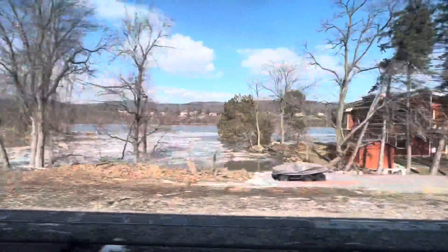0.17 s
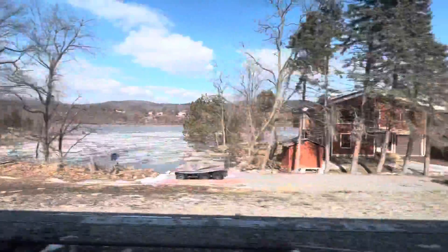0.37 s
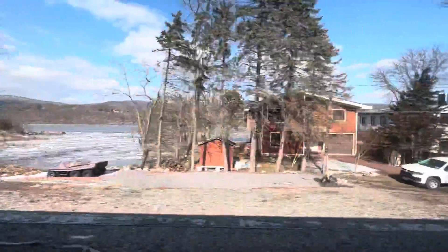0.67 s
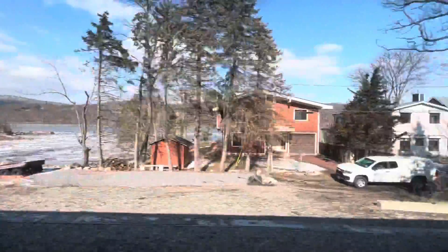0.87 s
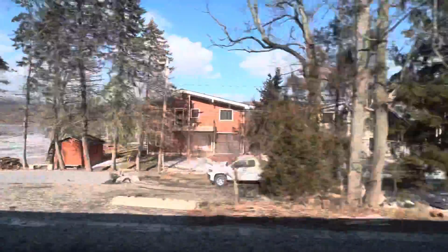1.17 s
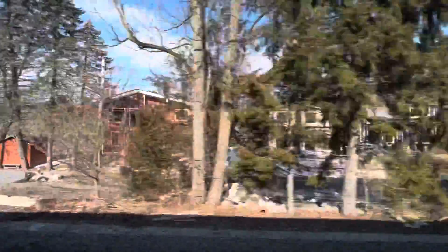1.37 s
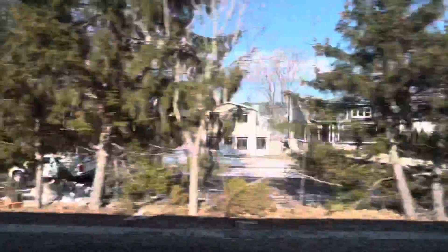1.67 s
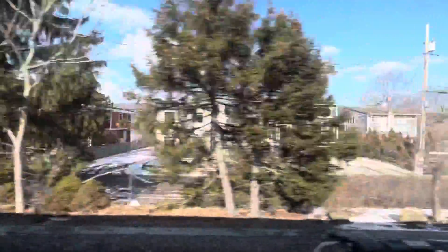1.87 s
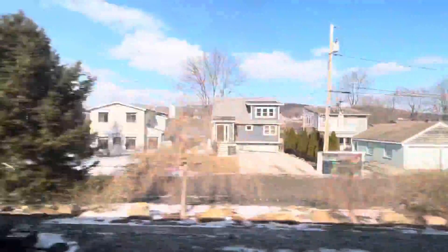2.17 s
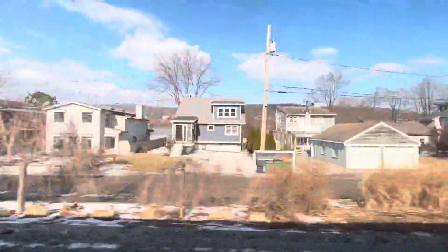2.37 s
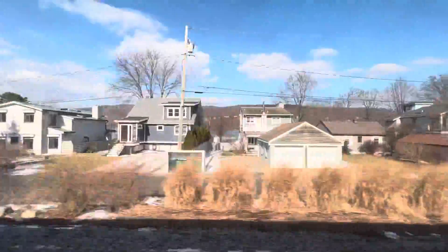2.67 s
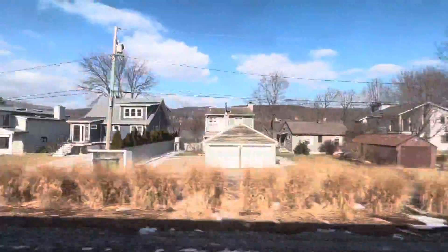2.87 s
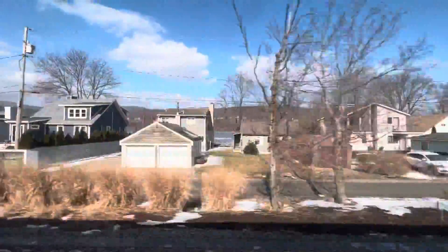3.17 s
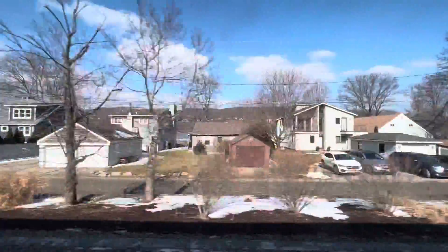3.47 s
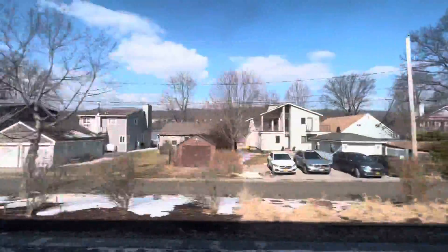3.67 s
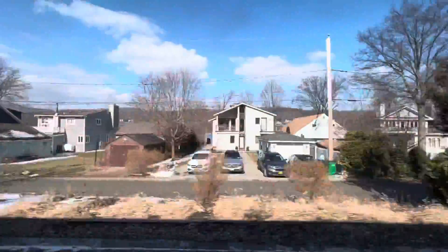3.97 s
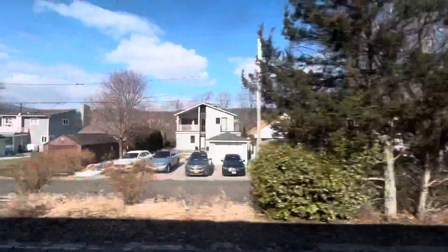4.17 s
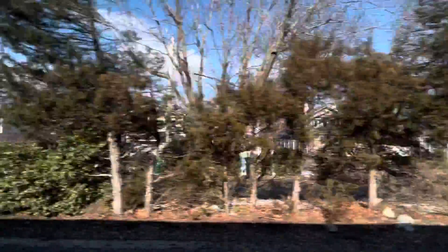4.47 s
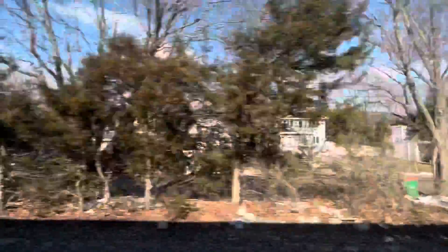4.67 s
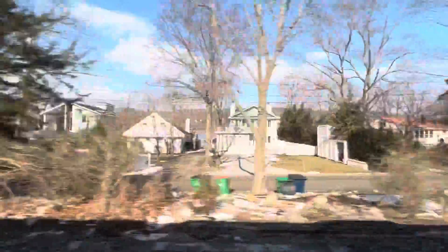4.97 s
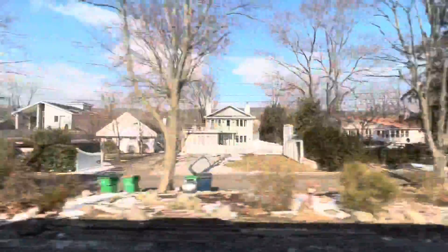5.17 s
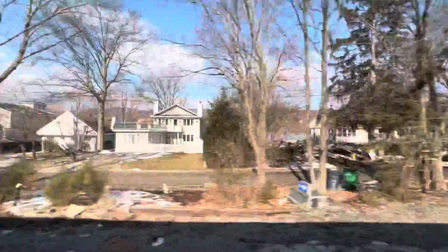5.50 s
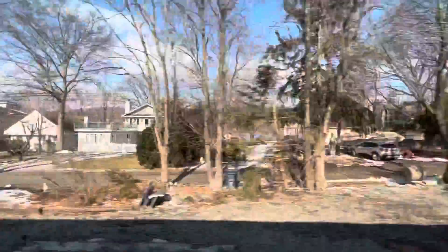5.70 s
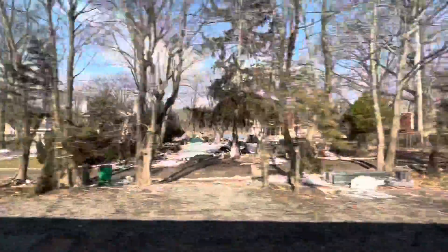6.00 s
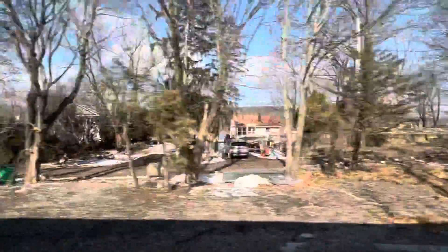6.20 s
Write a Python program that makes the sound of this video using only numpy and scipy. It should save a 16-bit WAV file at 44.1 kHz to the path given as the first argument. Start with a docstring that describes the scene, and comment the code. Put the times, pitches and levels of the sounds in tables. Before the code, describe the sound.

Close to a window inside a passenger train at steady speed, a low body boom and drone waver over floor rumble, muted wheel roar and soft air hiss. Jolts swell the lows; rough patches bring brief shudders, growls and grinding. A dry double crackle comes early, then sparse trim ticks and faint squeaks, with a deep bump near the middle and a soft padded knock shortly after.

```python
"""A carriage body booms and drones inside a passenger train rolling at steady speed, heard close to a window.
Boom and drone are wavering sine notes that jolts swell, over a rumble of coloured noise from the floor.
Wheel roar, bogie growl and a hiss of air are coloured noise; rough patches add shudder, growling notes and grinding.
Trim ticks are snaps of noise with ringing modes, squeaks are unsteady notes, soft high bursts and crackles are noise.
One deep bump is a swelling low note and one soft knock is a sinking one."""
import sys
import numpy as np
from scipy import signal
from scipy.fft import rfft, irfft, next_fast_len
from scipy.io import wavfile
from scipy.ndimage import uniform_filter1d

SR = 44100
rng = np.random.default_rng(int(sys.argv[2]) if len(sys.argv) > 2 else 0)


def put_to_file(sound):
    """Save the sound as 16-bit audio at rate SR, in the file named by the first command-line argument."""
    columns = np.atleast_2d(sound).T  # one column per channel
    safe = np.clip(columns, -1, 1)
    whole_steps = np.round(safe * 32767)
    wavfile.write(sys.argv[1], SR, whole_steps.astype(np.int16))


N = 279594  # length of the scene in samples

# how the two microphone ports hear the cabin:
# [f/Hz, likeness 0-1, phase by which left leads/rad, left minus right/dB]
PORTS = [(58, 1, 0, 1.3), (146, 0.98, -0.5, 0), (191.5, 1, -1, 0.5), (251.6, 0.5, 2.5, 11.5),
         (289.8, 0.99, -2, -3.5), (367, 0.14, 1.14, 3.5), (510, .15, 3.5, -1.5), (633, 0.3, 3.5, 4.5),
         (804, 0.48, 3.5, -1), (1090, 0.8, 4.5, 4.5), (1350, 0.4, 3.5, 8.5), (2000, 0.2, 6, 3.5),
         (2740, 0, 2, 3), (6000, 0, 1, 10), (8900, .15, 3, 0), (12000, .5, 0, 0)]
# unevenness of the track, before each layer's own scaling: [t/s, level/dB]
UNEVENNESS = [(0, -35.5), (0.5, -33.5), (0.9, -37), (1.12, -37), (1.7, -31), (2.0, -34.5), (2.35, -29),
              (2.52, -30), (2.95, -32), (3.22, -27.5), (3.53, -32.5), (3.82, -29.5), (4.2, -35.5),
              (4.52, -32), (4.78, -30.5), (5.0, -30.5), (5.62, -33), (5.9, -28), (6.1, -35.5)]
# strength of the wheels rolling on the rail, before each layer's own scaling: [t/s, level/dB]
ROLLING = [(0, -38), (0.5, -37), (1.2, -37), (1.65, -35.5), (1.9, -34), (2.03, -36), (2.37, -34),
           (2.6, -35), (2.75, -34.5), (2.95, -36), (3.35, -36), (4.35, -37), (5.2, -36.5), (5.7, -36),
           (5.81, -33.5), (5.92, -36), (6.1, -37), (6.2, -33.5), (6.34, -34)]
UNEVEN_USUAL_DB, ROLLING_USUAL_DB = -31, -37
BOOM_HZ, DRONE_HZ = 58.7, 129.7


def amp(db):
    """Decibels to gain."""
    return 10 ** (np.asarray(db) / 20)


def read(table, hz, axis=1):
    """One column of a table, interpolated over log frequency."""
    table = np.array(table, float)
    return np.interp(np.log(hz + 1), np.log(table[:, 0] + 1), table[:, axis])


def level(curve, usual_db=0, follow=1):
    """A dB curve as a gain for every sample; follow scales its swings about the usual level."""
    s, db = np.transpose(curve)
    curve_db = np.interp(np.arange(N) / SR, s, db)
    return amp(follow * (curve_db - usual_db))


def bins():
    """Frequencies of a spectrum that spans the whole scene."""
    return np.fft.rfftfreq(next_fast_len(N, True), 1 / SR)


def white():
    """Spectrum of white noise."""
    return rfft(rng.standard_normal(next_fast_len(N, True)))


def colour(points, axis=1):
    """Gain of a spectrum, falling steeply beyond its last point."""
    steep_fall = 1 + (bins() / (1.3 * points[-1][0])) ** 8
    return amp(read(points, bins(), axis)) / steep_fall


def add(mix, s, sound):
    """Mixes a sound in at time s, or at the very start if s is negative."""
    part = mix[max(round(s * SR), 0):][:len(sound)]
    part += sound[:len(part)]


def wander(rate_hz):
    """Chance movement of rms 1, smoothed to about rate_hz."""
    x = irfft(white() * np.exp(-(bins() / rate_hz) ** 2))[:N]
    return x / x.std()


def swell_at(s, half_s):
    """Start time and gain of a bell-shaped swell that peaks at s and is down to 1/e at half_s either side."""
    t = np.arange(-3 * half_s, 3 * half_s, 1 / SR)
    return s + t[0], np.exp(-(t / half_s) ** 2)


def cabin_noise(gain):
    """Coloured noise as the two ports hear it, alike or apart by frequency; their mean has rms 1."""
    same, lead, balance_db = (read(PORTS, bins(), axis=k + 1) for k in range(3))
    same = np.clip(same, 0, 1)
    a, b = white(), white()
    left = a * amp(balance_db / 2)
    partly_alike = same * a + np.sqrt(1 - same ** 2) * b
    right = partly_alike * np.exp(-1j * lead) * amp(-balance_db / 2)
    # size of the two ports summed, so that the gain holds for their mean
    centre = np.sqrt(amp(balance_db) + amp(-balance_db) + 2 * same * np.cos(lead))
    x = irfft(np.array([left, right]) * gain / centre)[:, :N]
    return x / x.mean(0).std()


def body_mode(hz, width_hz, hold_s):
    """A randomly driven resonance whose strength is held even over hold_s."""
    detune = (bins() ** 2 - hz ** 2) / ((bins() + 1) * width_hz)
    x = cabin_noise(1 / (1 + detune ** 2))  # the resonance applied twice: steep skirts
    power = x.mean(0) ** 2
    size = max(int(hold_s * SR), 1)
    smooth_power = uniform_filter1d(uniform_filter1d(power, size), size)
    return x / np.sqrt(smooth_power + 1e-6)


def body_note(hz, waver, waver_hz):
    """One unbroken low note that wanders a little in pitch, at the two ports; rms about 1."""
    cycles = np.cumsum(hz * (1 + waver * wander(waver_hz))) / SR
    phase = 2 * np.pi * (rng.random() + cycles)
    lead, balance_db = read(PORTS, np.mean(hz), axis=2), read(PORTS, np.mean(hz), axis=3)
    left = amp(balance_db / 2) * np.sin(phase)
    right = amp(-balance_db / 2) * np.sin(phase - lead)
    return np.sqrt(2) * np.array([left, right])


def unsteady_note(hz, size, waver, waver_hz):
    """A short note whose pitch and strength waver by chance; rms about 1."""
    smooth = np.exp(-(np.fft.rfftfreq(SR, 1 / SR) / waver_hz) ** 2)
    chance = irfft(rfft(rng.standard_normal((2, SR))) * smooth)
    pitch, strength = (np.resize(v / v.std(), size) for v in chance)
    phase = 2 * np.pi * np.cumsum(hz * (1 + waver * pitch)) / SR
    return np.sqrt(2) * amp(2 * strength) * np.sin(phase)


def bursts(rows, spectrum):
    """Bursts of coloured noise that rise in a straight line, then die away exponentially."""
    swell = np.zeros(N)
    t = np.arange(SR) / SR
    for s, db, rise, t60 in rows:
        decay = amp(db - 60 * np.maximum(t - rise, 0) / t60)
        add(swell, s, np.minimum(t / rise, 1) * decay)
    return swell * cabin_noise(colour(spectrum))


def air(hiss_db=-44.5, flutter_db=0.5):
    """Air rushing along the window: hiss that swells with the rolling noise and the uneven track."""
    # hiss of the air: [f/Hz, level per Hz/dB]
    hiss = [(1500, -3.5), (2500, -3), (3100, 1.5), (3800, -4), (4500, -5.5), (5200, -8.5), (5900, -7.5),
            (7500, -17), (9000, -20), (10500, -38.5), (16000, -35.5)]
    swell = level(ROLLING, ROLLING_USUAL_DB, follow=0.86) * level(UNEVENNESS, UNEVEN_USUAL_DB, follow=0.19)
    flutter = amp(flutter_db * wander(rate_hz=13))
    return amp(hiss_db) * swell * cabin_noise(colour(hiss)) * flutter


def machinery():
    """Hum of the car's machinery: narrow, slightly wavering resonances."""
    # steady hum lines: [f/Hz, rms level/dB]
    hum = [(87.6, -32), (301, -48.5)]
    return sum(amp(db) * body_mode(hz, width_hz=3.8, hold_s=0.12) for hz, db in hum)


def soft_high_bursts():
    """Soft high noise bursts, the first barely audible, with a quick random grain in their level."""
    # soft high bursts, level before the grain: [t/s, level/dB, rise/s, t60/s]
    burst_rows = [(.3, -60, .04, 0.31), (1.64, -55, 0.073, 0.32), (2.38, -49.5, 0.051, 0.32),
                  (2.459, -36.5, 0.005, 0.27), (3.0, -49, .035, 0.14), (5.735, -47, 0.05, 0.46),
                  (5.783, -43.5, 0.0084, 0.13)]
    # tone of the bursts: [f/Hz, level per Hz/dB]
    burst_tone = [(1200, 2), (1750, 9.5), (2800, 9.5), (4500, 4.5), (6300, 3), (7600, -2.5), (9000, 3.5),
                  (10400, -19.5), (12000, 2), (13500, -20), (16000, -15)]
    grain = amp(3.2 * wander(rate_hz=200))
    return bursts(burst_rows, burst_tone) * grain


def squeaks(right_db=-8.0):
    """Rubbing fittings on the left sing briefly on one unsteady note."""
    # faint squeaks, level midway between the ports: [t of peak/s, half length/s, f/Hz, level/dB]
    squeals = [(2.123, 0.057, 3280, -53), (2.719, .08, 3210, -47), (4.551, 0.047, 3200, -52.5),
               (4.918, .07, 4050, -48), (5.588, 0.011, 3440, -45), (5.574, 0.055, 3394, -48),
               (5.864, .04, 3246, -50), (6.22, .08, 3130, -47)]
    out = np.zeros((2, N))
    for s, half_s, hz, db in squeals:
        start, swell = swell_at(s, half_s)
        for port, port_db in enumerate((-right_db / 2, right_db / 2)):
            note = unsteady_note(hz, len(swell), waver=0.023, waver_hz=160)
            add(out[port], start, amp(db + port_db) * swell * note)
    return out


def crackles():
    """Two quick, dry crackles: noise bursts lasting a few milliseconds."""
    # crackles: [t/s, level/dB, rise/s, t60/s]
    crackle_rows = [(.8835, -28, 0.0012, 0.008), (.8925, -27, 0.0013, 0.009)]
    # tone of the crackles: [f/Hz, level per Hz/dB]
    crackle_tone = [(1200, -10), (2000, 4), (2450, -1), (3200, 9), (4200, -4), (5800, 0), (7600, -10),
                    (8900, -1), (10500, -16), (12300, -6), (16000, -17)]
    return bursts(crackle_rows, crackle_tone)


def trim_ticks(snap_db=0.0, ring_db=10.5, snap_t60=0.016, tail_db=-18, tail_t60=0.11, lag_s=0.00055):
    """A joint slips with a short snap and rings its panel; the right port hears it first."""
    # ticks, panel gain before ring_db: [t/s, level/dB, panel gain/dB, left minus right/dB, panel pitch ratio]
    ticks = [(1.5185, -28, 8, 0, 1.017), (2.026, -38, -8, -10, 1), (2.256, -25.5, 3.5, -1, 1.01),
             (2.8503, -32, -1, -3, 1.1), (2.9814, -33, 2, -2, 0.92), (3.251, -26.5, 2.5, 1.5, 1),
             (3.5591, -36, 5, -4, 1.2), (3.574, -39, 12.5, 9, .82), (5.2656, -32.5, 3, -2, 1.04),
             (5.397, -31.5, 6, 1, 1.08), (5.7035, -29, -1, 1.5, 1.02)]
    # what the trim rings with, f before the pitch ratio: [f/Hz, relative level/dB, t60/s]
    modes = [(1200, -1, 0.008), (1756, 1.5, 0.0087), (2180, -5.5, 0.0077), (2570, -9, 0.008),
             (4830, -14.5, 0.01), (6480, -22, 0.01)]
    # tone of the snap: [f/Hz, left level per Hz/dB, right level per Hz/dB]
    snap_tone = [(500, -4, -6), (1200, -3, -3), (2500, 9, -2), (3600, 2, -1), (4700, 7.5, -7),
                 (5500, 2, -8), (6700, 8, -3), (7900, -2, -9), (9040, -7, 2), (10300, -11, -16),
                 (13400, -20, -15), (16000, -24, -25)]
    t = np.arange(SR // 12) / SR
    out = np.zeros((2, N))
    grit = irfft(np.array([white() * colour(snap_tone, axis=1), white() * colour(snap_tone, axis=2)]))
    grit /= grit.std()
    onset = np.minimum(t / 0.0008, 1)
    fade = amp(snap_db - 60 * t / snap_t60) + amp(tail_db - 60 * t / tail_t60)
    for s, db, panel_db, pan_db, pitch in ticks:
        ring = sum(amp(mode_db - 60 * t / t60) * np.sin(2 * np.pi * hz * pitch * t)
                   for hz, mode_db, t60 in modes)
        for port, side in enumerate((1, -1)):
            snap = grit[port, round(s * SR):][:len(t)] * fade
            tick = onset * (snap + amp(ring_db + panel_db) * ring)
            add(out[port], s + lag_s * (side > 0), amp(db + side * pan_db / 2) * tick)
    return out


def knock(s=3.5797, db=-9.5, start_hz=560, end_hz=225, glide_s=0.00403, peak_s=0.0067,
          overtone_db=-17, lag_s=0.00035, right_db=-5.0):
    """A soft knock on a padded panel: a few lopsided cycles that sink in pitch, softer but sooner on the right."""
    t = np.arange(SR // 12) / SR
    hz = end_hz + (start_hz - end_hz) * np.exp(-t / glide_s)
    phase = 2 * np.pi * np.cumsum(hz) / SR
    swell = (t / peak_s * np.exp(1 - t / peak_s)) ** 3
    thud = amp(db) * swell * (np.sin(phase) + amp(overtone_db) * np.cos(2 * phase))
    out = np.zeros((2, N))
    add(out[0], s, thud)
    add(out[1], s - lag_s, amp(right_db) * thud)
    return out


def bump(s=2.898, half_s=0.025, hz=116, db=-12.5):
    """One short, deep bump comes up through the floor: a low note under a bell-shaped swell."""
    start, swell = swell_at(s, half_s)
    gain = np.zeros(N)
    add(gain, start, amp(db) * swell)
    return gain * body_note(hz, waver=0.0403, waver_hz=29.9)


def rough_rail():
    """Each rough patch shakes the floor, makes the bogie growl on one note and grinds under the wheels."""
    # rough patches, grinding before its chatter: [t of peak/s, half length/s, floor shudder/dB,
    # growl f/Hz, growl level/dB, grinding level/dB]
    patches = [(.74, 0.258, -50, 160.2, -30.5, -51), (2.098, 0.051, -20, 285, -34.5, -39.5),
               (2.33, 0.052, -18.5, 215.8, -26, -29.5), (2.431, 0.037, -23, 175, -34, -41),
               (2.75, .2, -24, 170.2, -36, -50), (3.22, 0.16, -21, 172, -31, -46.5),
               (3.83, 0.12, -22.5, 160, -30, -53), (4.759, 0.086, -18.5, 191, -45, -53),
               (4.86, .06, -37, 269, -34.5, -43), (5.41, 0.049, -34.5, 269.4, -37, -36.5),
               (5.91, 0.068, -35, 178, -26.5, -35.5), (6.196, .035, -32, 345, -42, -35.5),
               (6.298, 0.048, -22, 350, -44, -38)]
    # tone of the floor's shudder: [f/Hz, level per Hz/dB]
    shudder_tone = [(45, -32), (70, -11), (86, -4), (104, -6.5), (118, -8.5), (150, -30)]
    # tone of the grinding: [f/Hz, level per Hz/dB]
    grind_tone = [(150, -16.5), (260, -4), (350, 2), (520, 1.5), (850, -4), (1500, -14), (2200, -19.5),
                  (4500, -27.5)]
    shudder, growl, grind = np.zeros((3, N))
    chatter = amp(2.7 * wander(rate_hz=160) - 1.5)
    for s, half_s, floor_db, hz, growl_db, grind_db in patches:
        start, swell = swell_at(s, half_s)
        add(shudder, start, amp(floor_db) * swell)
        add(grind, start, amp(grind_db) * swell)
        note = unsteady_note(hz, len(swell), waver=0.0593, waver_hz=36.5)
        add(growl, start, amp(growl_db) * swell * note)
    shaking = shudder * cabin_noise(colour(shudder_tone))
    grinding = grind * chatter * cabin_noise(colour(grind_tone))
    return shaking + growl + grinding  # the growl is the same at both ports


def wheels(flutter_db=1.0):
    """Rolling roar over the growl of the bogie, fluttering with the grain of the rail."""
    # tone of the wheels' roar: [f/Hz, level per Hz/dB]
    roar_tone = [(500, -10), (780, -11), (1060, -1.5), (1350, -1), (1720, -4), (1950, -10), (2300, -13.5),
                 (4000, -42)]
    # tone of the bogie's growl: [f/Hz, level per Hz/dB]
    bogie_tone = [(180, -3.5), (290, 0), (370, -1.5), (500, 1), (640, 2), (780, -5), (1200, -17.5)]
    # strength of the bogie's growl, before the flutter: [t/s, level/dB]
    bogie_level = [(0, -44), (.7, -41), (1.15, -43.5), (1.7, -39), (2.0, -40.5), (2.45, -38), (2.9, -40.5),
                   (3.7, -40), (4.3, -41), (5.6, -40), (6.0, -39.5), (6.34, -36)]
    roar = amp(-0.05) * level(ROLLING) * cabin_noise(colour(roar_tone))
    growl = level(bogie_level) * cabin_noise(colour(bogie_tone))
    return (roar + growl) * amp(flutter_db * wander(rate_hz=12))


def jolted(rise_s=0.0471, fall_s=0.0386):
    """Each jolt from the track swells the boom and the drone, and pulls the boom towards its own pitch."""
    # jolts, levels before the trims in car_body: [t of peak/s, boom level/dB, drone level/dB, boom f/Hz]
    jolts = [(0.465, -13.5, -33, 58.2), (1.38, -16, -29, 53), (1.71, -17.5, -23.5, 69.5),
             (1.83, -14, -47, 63.7), (2.40, -14, -32, 51.1), (2.49, -14.5, -29, 60.8),
             (3.16, -20, -19.5, 70.06), (3.45, -13.5, -19.5, 58.5), (3.88, -13, -42, 55.93),
             (4.02, -21.5, -31, 59.2), (4.329, -17, -18.5, 57), (4.45, -13, -50, 56.56),
             (4.55, -14, -41, 56), (4.941, -11.5, -45, 66), (5.13, -13, -44.5, 62),
             (5.44, -12, -19.5, 60.2)]
    boom, drone, bend_hz = np.zeros((3, N))
    for s, boom_db, drone_db, hz in jolts:
        t = np.arange(N) / SR - s
        swell = np.exp(-(t / np.where(t < 0, rise_s, fall_s)) ** 2)
        boom += amp(boom_db) * swell
        drone += amp(drone_db) * swell
        bend_hz += (hz - BOOM_HZ) * np.sqrt(swell)
    return boom, drone, bend_hz


def car_body(boom_db=-23, boom_sway_db=3.5, drone_sway_db=2.5):
    """Body boom, panel drone over an octave higher and floor rumble; smooth track holds both notes steadier."""
    # tone of the floor's rumble: [f/Hz, level per Hz/dB]
    rumble_tone = [(12, -29.5), (28, 0), (42, -1), (70, -2.5), (92, 0.5), (112, -0.5), (165, -2),
                   (205, -7.5), (248, -17.5), (298, -13), (380, -23.5), (700, -54.5)]
    # strength of the panel's drone, before sway, jolts and trim: [t/s, level/dB]
    drone_level = [(0, -31.5), (.72, -33), (1.02, -38), (1.6, -30), (1.9, -36), (2.2, -29.5), (2.85, -29),
                   (3.02, -37), (3.15, -26), (3.9, -27), (4.1, -44), (4.22, -28.5), (4.55, -33), (5.3, -25),
                   (5.6, -23.5), (5.92, -27.5), (6.05, -20), (6.3, -20.5)]
    boom_swell, drone_swell, bend_hz = jolted()
    unrest = level(UNEVENNESS, UNEVEN_USUAL_DB, follow=1.084)

    boom_sway = boom_sway_db * np.minimum(unrest, 1) * wander(rate_hz=10)
    shaking = amp(boom_db + boom_sway) * level(UNEVENNESS, UNEVEN_USUAL_DB, follow=0.32)
    boom_note = body_note(BOOM_HZ + bend_hz, waver=0.053 * unrest, waver_hz=12.8)
    boom = amp(-0.5) * np.hypot(shaking, boom_swell) * boom_note

    buzzing = level(drone_level) * amp(drone_sway_db * wander(rate_hz=8.3))
    drone_note = body_note(DRONE_HZ, waver=0.0401 * unrest, waver_hz=11)
    drone = amp(-0.85) * np.hypot(buzzing, drone_swell) * drone_note

    rumble = amp(6.0) * level(UNEVENNESS) * cabin_noise(colour(rumble_tone))
    return boom + drone + rumble


def scene():
    """The running noise of the train and the small sounds in the carriage."""
    running = air() + machinery() + wheels() + rough_rail() + car_body()
    small_sounds = soft_high_bursts() + squeaks() + crackles() + trim_ticks()
    return running + small_sounds + knock() + bump()


def record(dry, edge_hz=15900):
    """A steep upper band limit, run both ways to keep the timing, with a soft start and stop."""
    soft = dry * signal.windows.tukey(N, 0.0015)
    band_limit = signal.cheby1(12, 0.05, edge_hz, fs=SR, output="sos")
    return signal.sosfiltfilt(band_limit, soft)


dry = scene()
out = record(dry)
put_to_file(out)
```